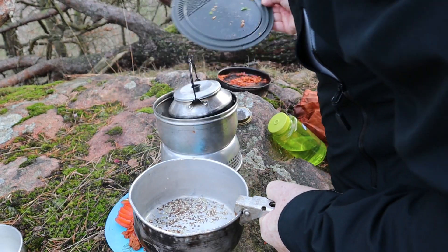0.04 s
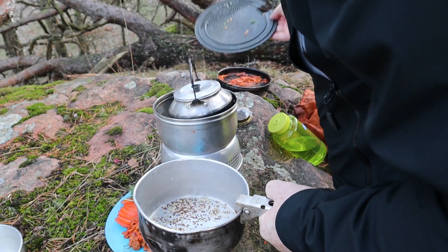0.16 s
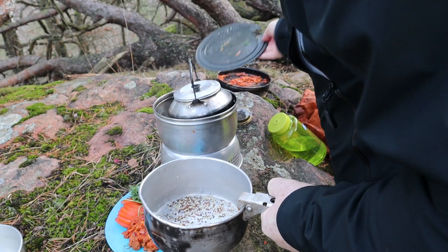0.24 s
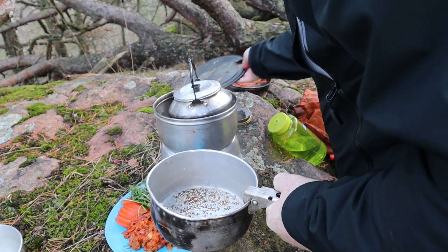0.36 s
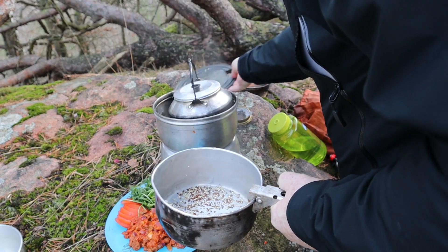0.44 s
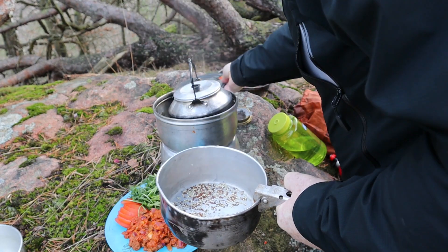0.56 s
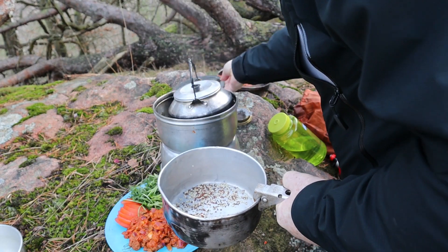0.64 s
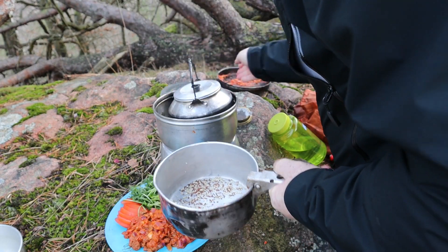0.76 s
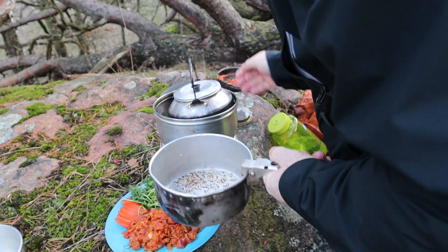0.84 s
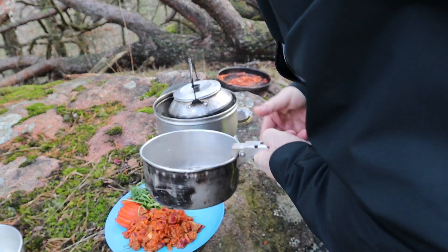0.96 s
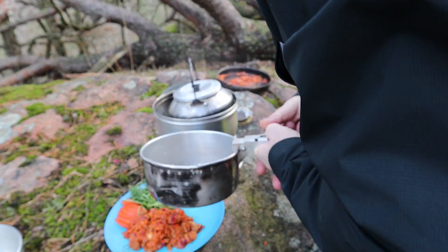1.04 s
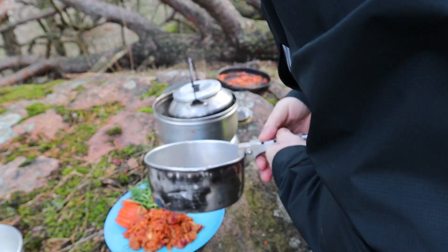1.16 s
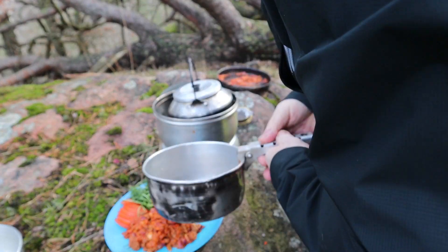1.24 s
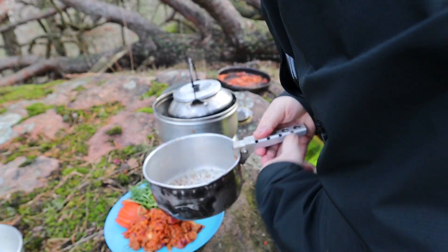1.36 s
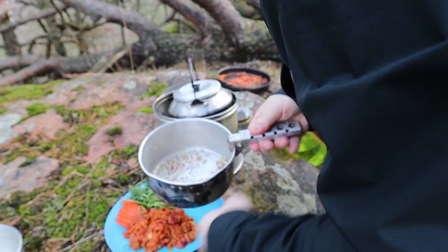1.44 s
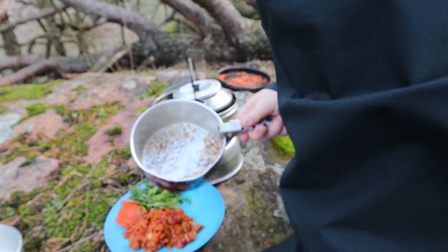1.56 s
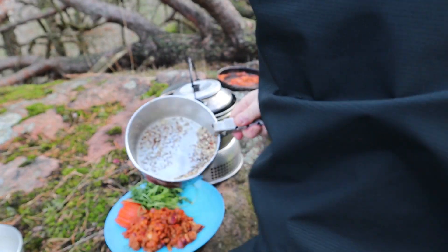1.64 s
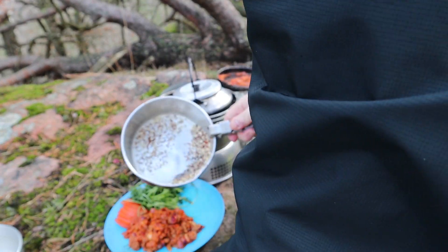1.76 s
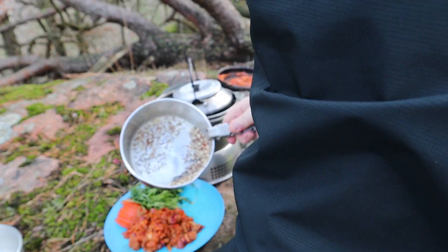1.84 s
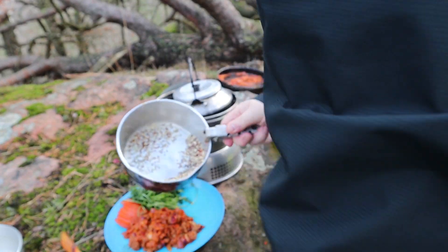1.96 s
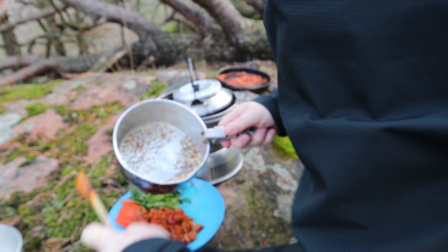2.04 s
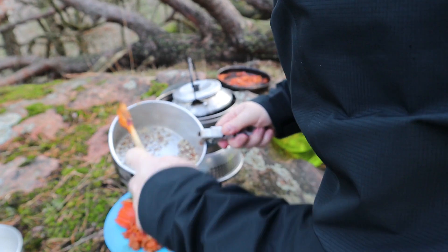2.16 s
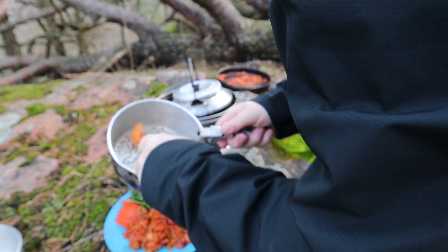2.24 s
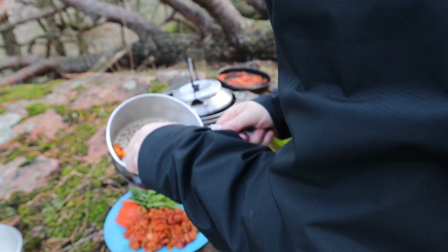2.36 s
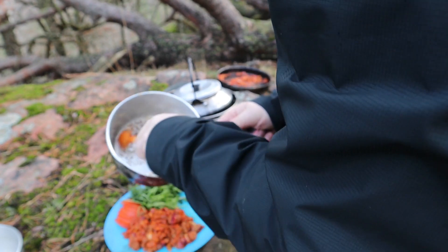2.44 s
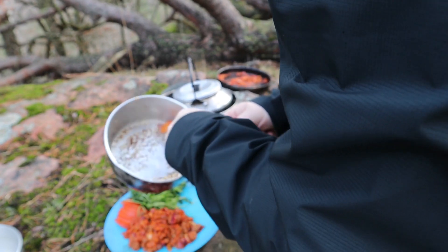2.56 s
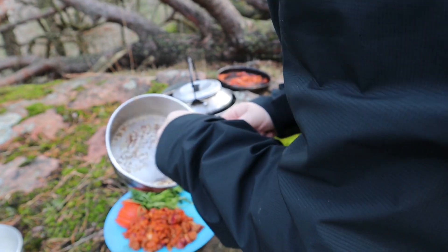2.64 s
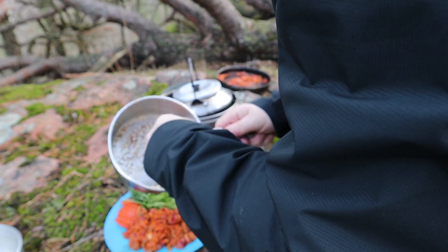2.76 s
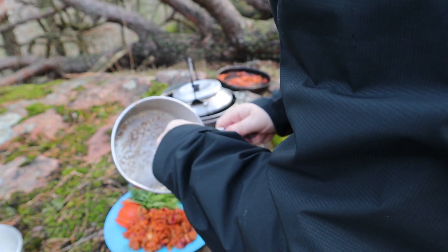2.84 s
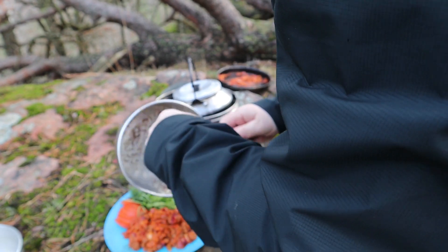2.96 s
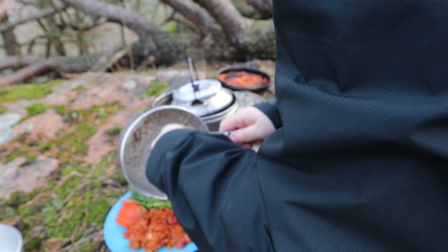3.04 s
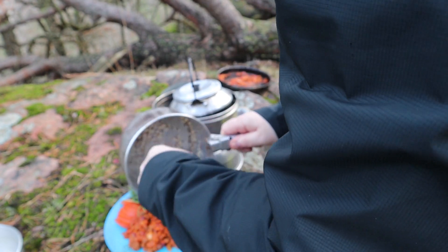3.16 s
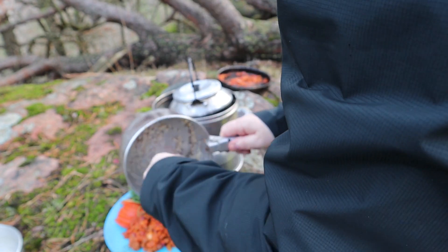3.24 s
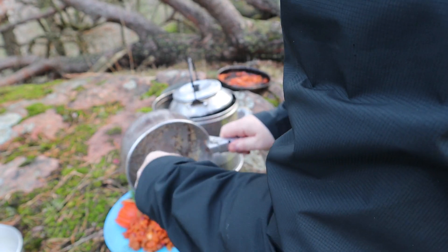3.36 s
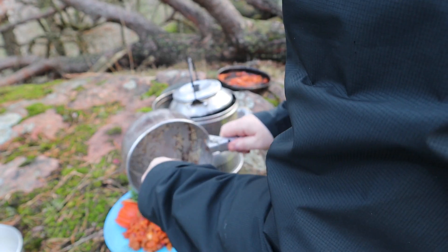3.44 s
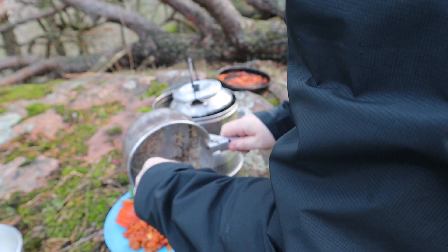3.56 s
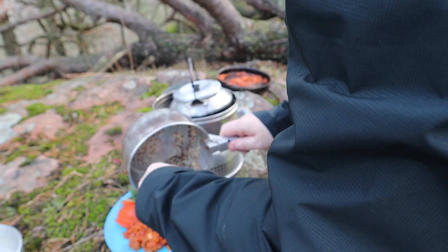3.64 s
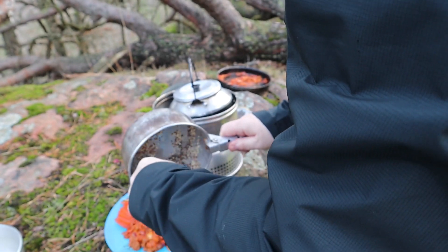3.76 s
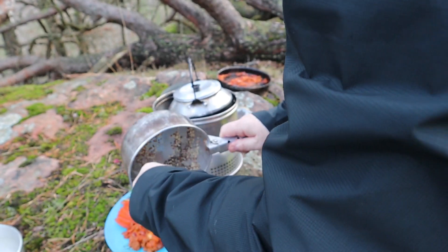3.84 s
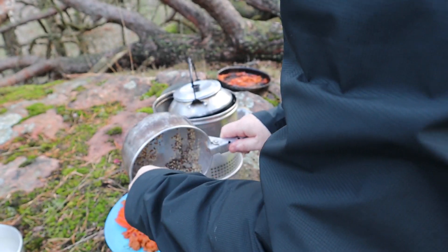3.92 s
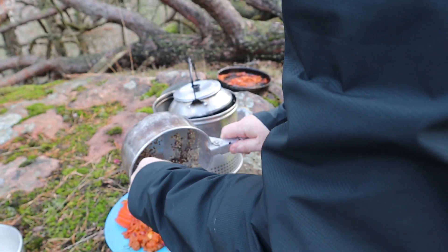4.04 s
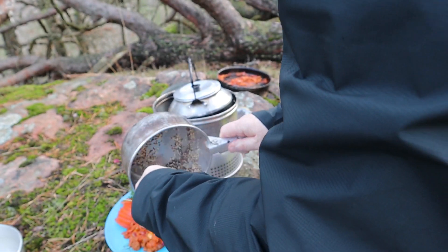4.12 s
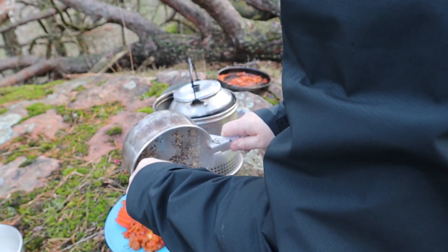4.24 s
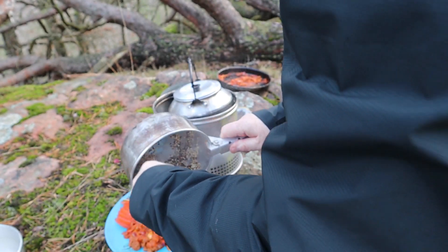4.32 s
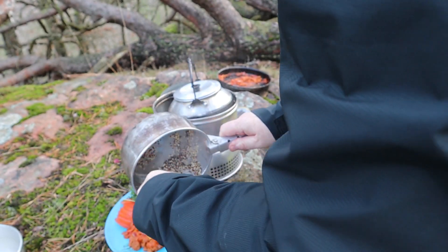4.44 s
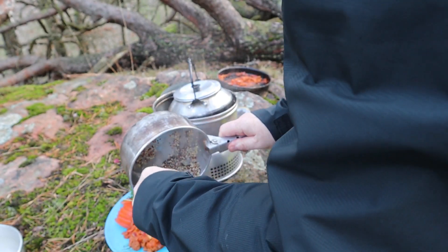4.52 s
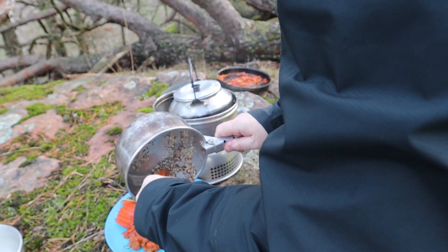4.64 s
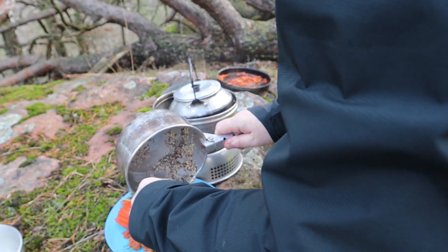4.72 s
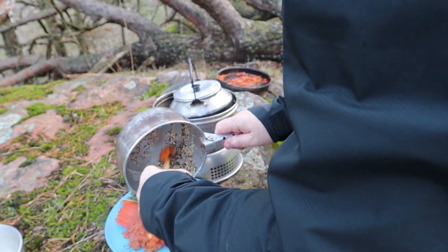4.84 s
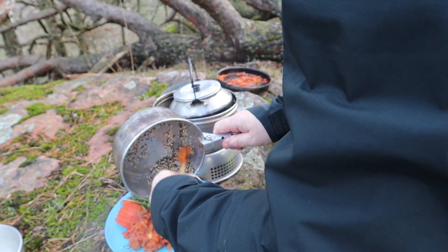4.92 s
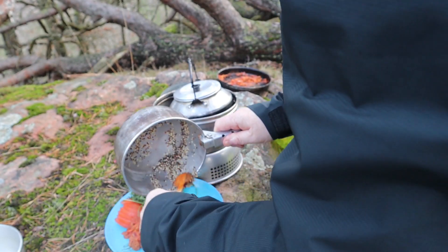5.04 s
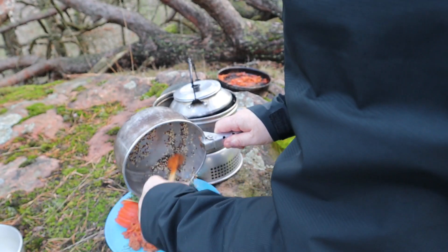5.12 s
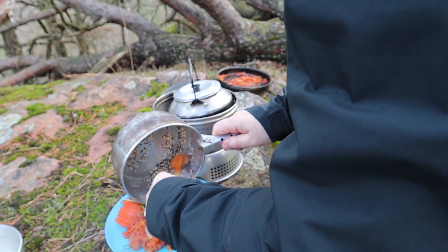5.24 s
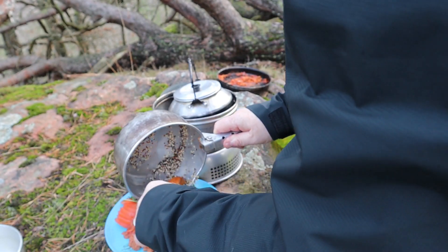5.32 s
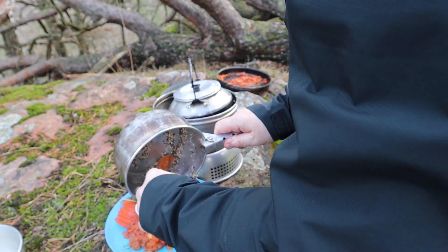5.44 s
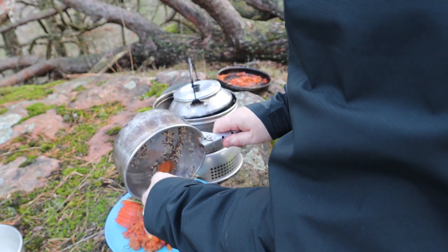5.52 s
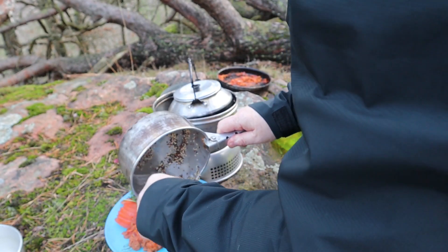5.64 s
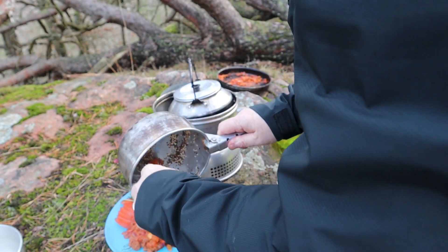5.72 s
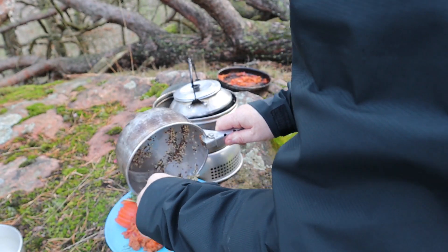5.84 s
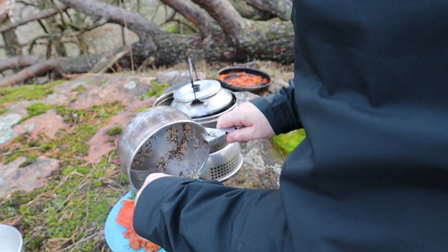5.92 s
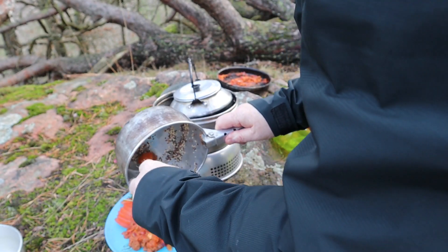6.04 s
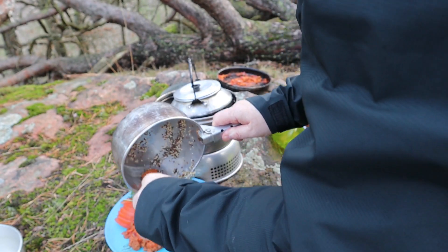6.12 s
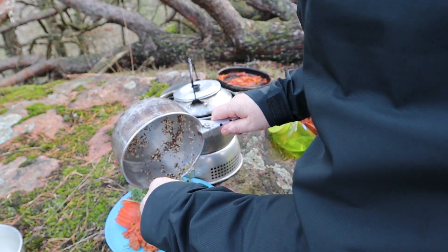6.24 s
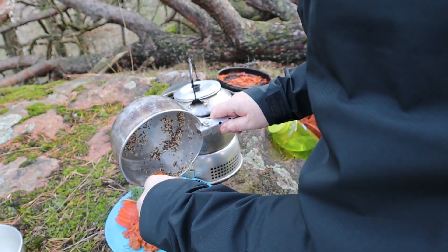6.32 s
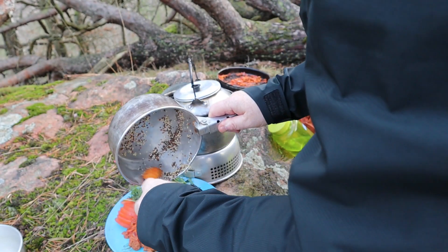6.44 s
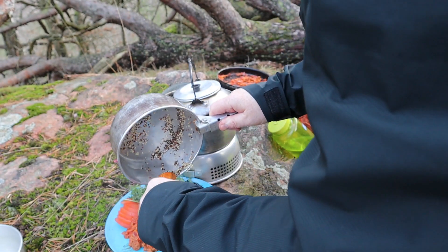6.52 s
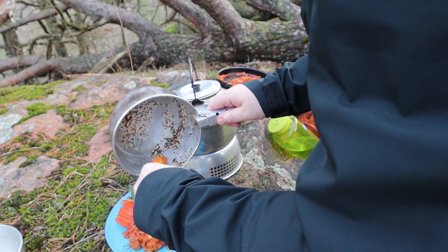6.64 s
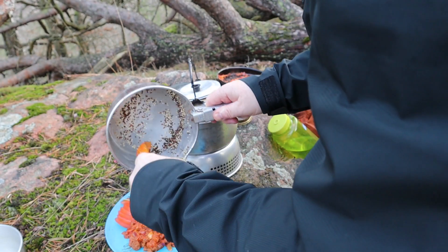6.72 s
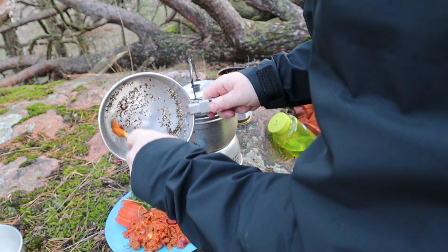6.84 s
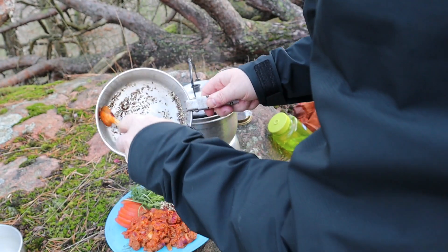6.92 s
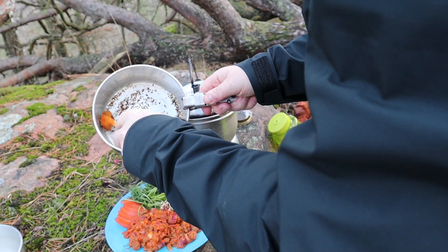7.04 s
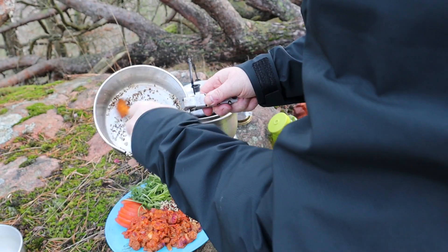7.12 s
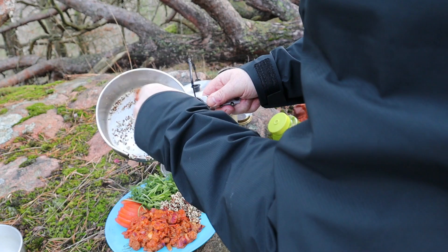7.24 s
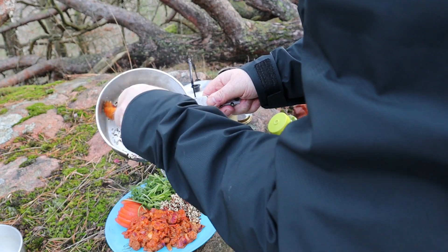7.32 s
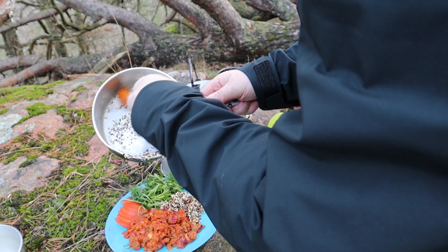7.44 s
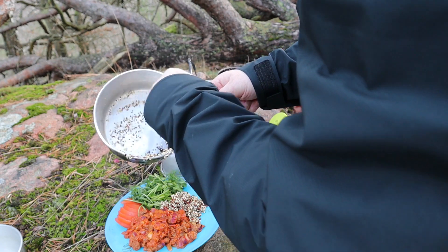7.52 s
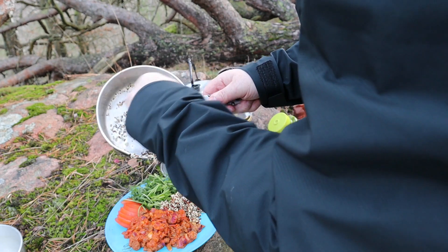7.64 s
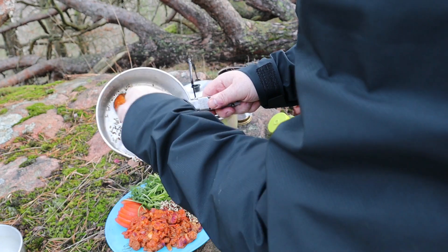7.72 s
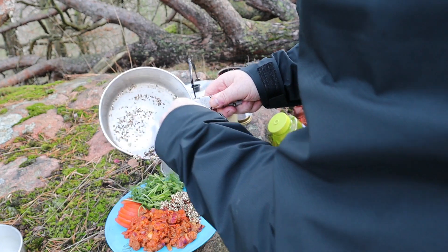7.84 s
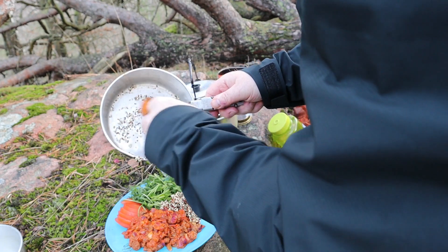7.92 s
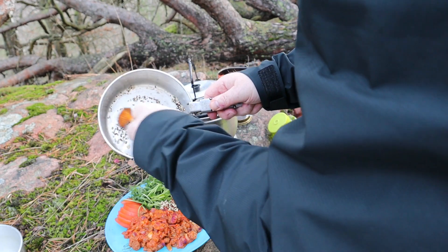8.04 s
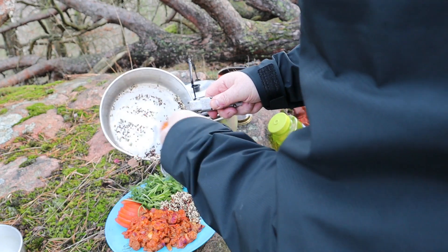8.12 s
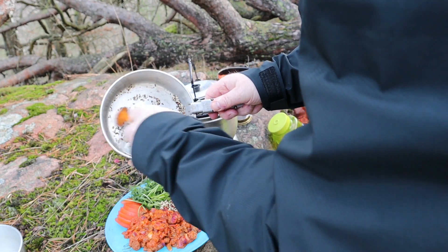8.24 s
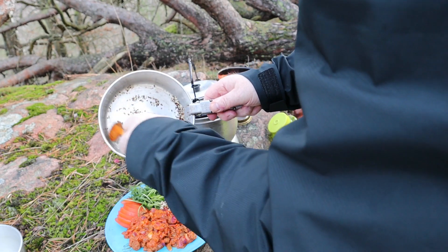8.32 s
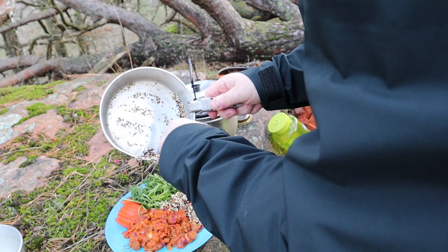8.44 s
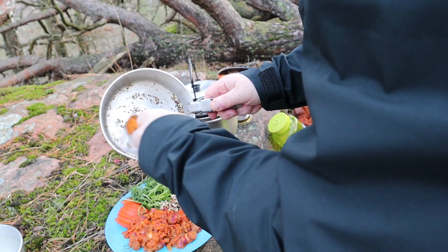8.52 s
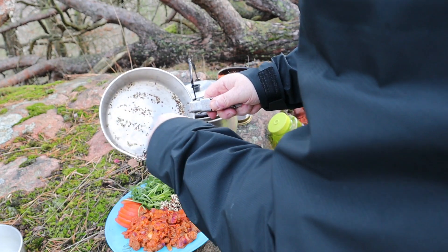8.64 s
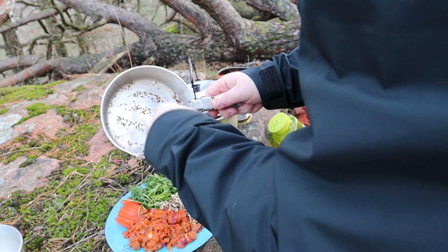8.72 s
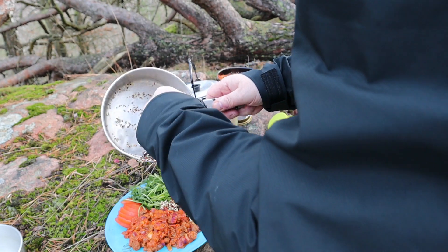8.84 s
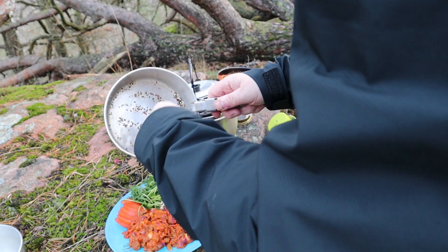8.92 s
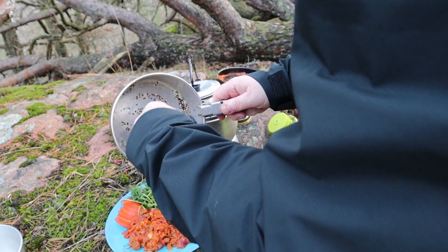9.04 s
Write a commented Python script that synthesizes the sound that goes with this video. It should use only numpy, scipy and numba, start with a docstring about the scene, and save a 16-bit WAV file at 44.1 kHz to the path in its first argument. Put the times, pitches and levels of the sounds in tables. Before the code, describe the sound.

Outdoors, a nylon sleeve rustles and a lid clacks down, then a plastic spoon knocks and scrapes sticky food from a thin, ringing metal pot.

```python
"""A soft forest rush and a nylon sleeve close by, with muffled bumps of gear, then a plastic lid is put down. A
thin camping pot is picked up, its metal gripper clinking, and scraped out with a plastic spoon. Knocks, first
of the gripper and then of the spoon, ring the pot's base and wall as decaying modes and add a clack of spoon
modes. Strokes are trains of random grain clicks that shake pot and spoon and sweep a resonant gap. Forest,
sleeve and crackling food are noise or grains shaped by a spectrum and a slow level curve."""
import sys
import numpy as np
from scipy import signal
from scipy.fft import rfft, irfft
from scipy.io import wavfile
from scipy.ndimage import uniform_filter1d
from numba import njit

SR = 44100
rng = np.random.default_rng(int(sys.argv[2]) if len(sys.argv) > 2 else 0)


def generate_wav(sig):
    """Save sig (samples, or channels by samples) to the path in sys.argv[1] as 16-bit PCM at SR."""
    pcm = np.round(np.clip(np.atleast_2d(sig).T, -1, 1) * 32767).astype(np.int16)
    wavfile.write(sys.argv[1], SR, pcm)


N = 399987
TOP_HZ = 15900
TIME = np.arange(N) / SR  # s
AFTER = np.arange(SR // 4) / SR  # s since a blow


def undb(db):
    """Decibels to gain."""
    return 10 ** (np.asarray(db) / 20)


def unit(x):
    """Scale to rms 1."""
    return x / np.sqrt(np.mean(x ** 2))


def noise(size):
    """White Gaussian noise."""
    return rng.standard_normal(size)


def curve(points):
    """Straight lines through (time_s, level_db) points, over the whole scene."""
    return np.interp(TIME, *np.transpose(points))


def fade(t60_s):
    """Exponential decay after a blow, 60 dB in t60_s."""
    return np.exp(-np.log(1000) * AFTER / max(t60_s, .002))


def add(out, start_s, x):
    """Mix x into out from start_s."""
    i = max(int(start_s * SR), 0)
    out[i:i + len(x)] += x[:N - i]


def colour(x, points):
    """Filter by a (freq_hz, level_db) spectrum, falling 12 dB/octave beyond its ends; rms 1."""
    freq_hz, level_db = np.transpose(points)
    octave = np.log2(np.fft.rfftfreq(len(x), 1 / SR) + 1)
    known = np.log2(freq_hz)
    skirt_db = -12 * abs(octave - np.clip(octave, known[0], known[-1]))
    gain = undb(np.interp(octave, known, level_db) + skirt_db)
    return unit(irfft(rfft(x) * gain, len(x)))


def walk(rate_hz, size):
    """Smoothed random steps with spread near 1."""
    k = max(int(SR / rate_hz), 1)
    steps = np.repeat(noise(size // k + 1), k)
    return np.sqrt(3 / 2) * uniform_filter1d(steps, k)[:size]


def grains(size, per_s, spread_db):
    """Dense random clicks; a larger spread makes them more unequal; rms 1."""
    strength = undb(spread_db * np.minimum(rng.exponential(size=size), 4))
    return unit(noise(size) * strength * (rng.random(size) < per_s / SR))


def ring(modes, clock_s=AFTER):
    """Sum of decaying (freq_hz, level_db, t60_s) modes; neighbours swing in opposite directions."""
    out = 0
    for k, (freq_hz, level_db, t60_s) in enumerate(modes):
        swing = np.sin(2 * np.pi * freq_hz * clock_s)
        out = out + (-1) ** k * undb(level_db) * fade(t60_s) * swing
    return out


def spot(modes, detune, spread_db):
    """Each point of contact shifts the modes a little and favours other ones."""
    return [(hz * (1 + detune * rng.standard_normal()), db + spread_db * rng.standard_normal(), t60_s)
            for hz, db, t60_s in modes]


def burst(points, t60_s):
    """Coloured noise that dies away without a pitch."""
    return colour(noise(len(AFTER)), points) * fade(t60_s)


def taps(events, points, t60_s):
    """Dry contacts: one burst for each (start_s, level_db)."""
    out = np.zeros(N)
    for start_s, level_db in events:
        add(out, start_s, undb(level_db) * burst(points, t60_s))
    return out


@njit
def resonate(x, hz, width_hz):
    """State-variable band-pass whose centre moves."""
    y, band, low = np.empty(len(x)), 0., 0.
    for i in range(len(x)):
        g, k = np.tan(np.pi * hz[i] / SR), width_hz / hz[i]
        v = (band + g * (x[i] - low)) / (1 + g * (g + k))
        band, low, y[i] = 2 * v - band, low + 2 * g * v, k * v
    return y


# forest spectrum: freq_hz, rel_level_db
FOREST = [(12, -38), (20, -11), (77, -2.5), (241, -1.5), (434, 2), (698, -0.5), (897, 1.5), (1610, -8),
          (3340, -13.5), (4420, -20), (8410, -21), (10200, -28), (13200, -26), (16000, -33)]
# mean level of the air flutter: time_s, level_db
DRAUGHT = [(0, -59.5), (1.4, -60), (2.2, -53), (3.3, -60), (6.5, -53), (7.9, -63), (9.07, -49)]


def forest(rush_db=-46):
    """A far, even rush of noise, and a low flutter of air over the microphone."""
    rush = colour(noise(N), FOREST) * undb(rush_db + 0.29 * walk(2.5, size=N))
    air = colour(noise(N), [(22, -6), (60, -5), (130, -10.5), (260, -16.5)])
    return rush + air * undb(curve(DRAUGHT) + 2 * walk(7.3, size=N))


def movements(rows):
    """Strength of arm movements that speed up and slow down; the strongest at each moment leads."""
    t = TIME[::100]
    each = []
    for peak_s, swell_s, fade_s, level_db in rows:
        span_s = np.where(t < peak_s, swell_s, fade_s)
        each.append(undb(level_db) * np.exp(-((t - peak_s) / span_s) ** 2))
    return np.interp(TIME, t, np.max(each, axis=0))


# wide reaches of the arm: peak_s, swell_s, fade_s, rel_level_db
REACHES = [(0, .1, 0.15, -50.5), (.5, 0.24, .2, -47), (1.07, 0.24, .14, -38), (1.72, 0.28, 0.085, -39),
           (2.13, 0.13, 0.15, -42)]
# nylon cloth spectrum: freq_hz, rel_level_db
CLOTH = [(120, -34), (200, -14), (244, -10), (413, -14), (457, -7.5), (904, 2), (1030, -2), (1310, -0.5),
         (6000, -13), (7800, -34), (13200, -120)]
# small arm swing leading into every knock; rest level between movements
SWING_DB, SWING_LEAD_S, SWING_S, REST_DB = -53.5, 0.016, 0.059, -63.5


def sleeve(rustle_db=-1, reach_sheen_db=-9.5, swing_sheen_db=-8, flutter_db=1.6):
    """Nylon threads slide over each other as the arm reaches out or swings into a knock."""
    swings = [(s - SWING_LEAD_S, SWING_S, SWING_S, SWING_DB) for s, *_ in KNOCKS]
    reach = movements(REACHES)
    swing = undb(REST_DB) + movements(swings)
    rustle = undb(rustle_db) * np.hypot(reach, swing) * colour(grains(N, per_s=6000, spread_db=0.5), CLOTH)
    sheen_gain = np.hypot(undb(reach_sheen_db) * reach, undb(swing_sheen_db) * swing)
    sheen = sheen_gain * colour(grains(N, per_s=12000, spread_db=0.5), GRIT)
    return (rustle + sheen) * undb(flutter_db * walk(35, size=N))


# soft bumps of handled gear: start_s, level_db
BUMPS = [(.055, -35.5), (.32, -37), (.805, -35.5), (.83, -35.5), (.889, -39), (.934, -33), (.942, -35),
         (.970, -30)]
# bump spectrum: freq_hz, rel_level_db
BUMP = [(250, -19), (480, -1), (900, 0.5), (1300, -12), (4000, -26)]


def bumps():
    """Gear is handled: soft, low contacts without pitch."""
    return taps(BUMPS, BUMP, t60_s=0.068)


# lid meets the rock: start_s, level_db
LID_TAPS = [(0.6342, -17), (0.6382, -43)]
# lid spectrum: freq_hz, rel_level_db
LID = [(88, -45), (150, -22), (612, 1.5), (1010, -1), (1320, -7), (1640, -23), (1870, -24), (2700, -8),
       (2970, -30), (3400, 3), (3670, -13), (3970, -3), (5950, -20), (8410, -18), (15000, -60)]


def lid():
    """The plastic lid lands on rock: dry noise, quickly damped."""
    return taps(LID_TAPS, LID, t60_s=0.02)


# gripper shifts on the rim: start_s, level_db
GRIPS = [(1.365, -30), (1.444, -36), (2.128, -34)]
# gripper modes: freq_hz, rel_level_db, t60_s
GRIPPER = [(1610, 0, .035), (2440, -0.5, 0.03), (3090, -8.5, 0.033)]


def gripper(tick_db=-7, tick_t60_s=0.031):
    """The metal gripper clinks against the rim as the pot changes hands: ringing modes and a tick."""
    out = taps([(s, db + tick_db) for s, db in GRIPS], TICK, tick_t60_s)
    for start_s, level_db in GRIPS:
        add(out, start_s, undb(level_db) * ring(spot(GRIPPER, 0.0083, 3)))
    return out


# knocks on the pot, first by the metal gripper, then by the spoon; levels relative, press = how hard the
# striker stays on (0-1): # start_s, base_db, wall_db, thud_db, thud_hz, clack_db, tick_db, press
KNOCKS = [(1.7016, -10.5, -17, -14, 560, -11, -20.5, 0.2), (1.711, -44, -24, -40, 600, -21, -26, 0.03),
          (1.722, -47, -32, -45, 600, -25, -37, 0), (1.797, -24.5, -40, -20.5, 740, -23, -37, 1),
          (1.9483, -13.5, -18.5, -17, 694, -16, -24.5, 0.28),
          (2.426, -26, -25, -35, 585, -20.5, -34.5, 0.18), (2.4581, -13.5, -24.5, -9, 614, -43, -47, 0.15),
          (2.552, -41, -29.5, -38, 600, -47, -40, 0), (2.617, -16.5, -31, -11, 695, -25.5, -23.5, 0.13),
          (2.8019, -13, -19, -17, 570, -31, -35.5, 0.16), (2.812, -2.5, -12, -33, 312, -24, -37, 1),
          (2.845, -18, -23, -25, 570, -29, -39, 0.7), (2.89, -25.5, -34, -40, 352, -46, -37, .2),
          (3.0125, -21, -27, -18, 740, -50, -58, .2), (3.098, -26, -24, -42, 760, -52, -34, 0.05),
          (3.232, -21, -26.5, -33, 760, -45, -49, 0.02), (3.266, -36, -30, -45, 600, -47, -36, .1),
          (3.5148, -49, -50, -45, 310, -34, -36, 0.5), (3.633, -50, -54, -47, 670, -41, -36, 0),
          (4.208, -42, -45, -45, 300, -37, -50, .1), (4.376, -9, -19.5, -22, 694, -23.5, -28, 0.13),
          (4.49, -30, -48, -44, 580, -48, -39, 0), (4.691, -17, -37, -17, 570, -20, -37, 0.02),
          (4.8334, -33, -34, -34, 296, -29, -41, .9), (5.0056, -21.5, -23.5, -42, 570, -8.5, -12.5, 0),
          (5.298, -21.5, -30, -20, 730, -32, -14, 0), (5.5234, -7.5, -21.5, -22, 710, -26, -48, 0.09),
          (5.806, 1.5, -11, -35, 523, -13, -21, 0.41), (5.868, -19.5, -45, -20.5, 724, -12.5, -33, 0.03),
          (6.1431, -10, -27, -28, 706, -29, -34, 0.03), (6.197, -22.5, -36, -24, 684, -10, -19.5, 0.5),
          (6.5254, -23, -25.5, -25, 560, -20.5, -22, 0), (6.677, -18, -27, -17.5, 555, -23.5, -27.5, 0.19),
          (7.0167, -28.5, -43, -28, 380, -45, -31.5, 0), (7.1518, -11.5, -14, -5, 590, -18, -28.5, 0.1),
          (7.2454, -20.5, -38, -23, 674, -43, -39, 0.48), (7.468, -17, -11, -1, 550, -23, -26, 0.05),
          (7.534, -31, -26, -21, 590, -32, -37, 0.43), (7.563, -47, -26, -19, 614, -28, -34, 0),
          (7.769, -44, -38, -44, 597, -52, -31.5, 0), (7.8114, -1, -9, 1.5, 670, -17, -33, 0.64),
          (7.909, -32, -25.5, -45, 600, -20.5, -33, 0.12), (8.0916, -4.5, -5.5, 4, 676, -11.5, -31.5, 0.71),
          (8.211, -33, -38, -45, 600, -36, -32, 0.18), (8.3845, -10.5, -8, -2.5, 640, -42, -37, 0.15),
          (8.4506, -14, -21, -45, 600, -17.5, -30, 0.57), (8.5615, -27.5, -28, -34, 345, -49, -43, 0),
          (8.65, -23, -25, -13, 434, -30, -23, 0.3), (8.9072, -7, -15, -45, 600, -33, -23.5, 0.04),
          (8.956, -30, -20, -28, 380, -30.5, -31, 0.53)]
# upper modes of the pot wall: freq_hz, rel_level_db, t60_s
WALL = [(857, 0, 0.013), (1215, -25, 0.094), (1498, -10, 0.063), (1920, -35, 0.052), (2263, -18.5, 0.039),
        (3250, -33, 0.035)]
# spoon modes, also used for the clack of the gripper's knocks: freq_hz, rel_level_db, t60_s
SPOON = [(1315, -6.5, .025), (1546, 1, 0.02), (1955, -10.5, 0.026), (2221, -8, 0.026), (2690, -19.5, 0.031),
         (2930, -17.5, 0.043), (3394, -12.5, 0.026), (4100, -20, 0.03), (8260, -24, .025)]
# hard-contact spectrum: freq_hz, rel_level_db
TICK = [(1500, 14), (3300, 8), (5200, 7.5), (8000, 9), (9500, 2.5), (12500, 3.5), (16000, -8)]
BASE_HZ = 423  # drum mode of the free base


def knocks(contact_s=0.0047, stiffen=0.44, base_loss_db_per_s=2200, wall_loss_db_per_s=1000, rise_s=0.00062,
           free_t60_s=0.22, damping=2.38, rim_hz=768, rim_stiffen=0.1, rim_t60_s=0.1, thud_t60_s=0.017,
           tick_t60_s=0.03, tick_offset_db=-3, spot_db=2, radiate_hz=290, hardness=0.52, cushion_db=9):
    """The pressed striker stiffens and damps the base and the two thud together; then the pot rings freely."""
    out = np.zeros(N)
    contact = np.cumsum(np.exp(-(AFTER / contact_s) ** 2)) / SR  # s of contact so far
    onset = 1 - np.exp(-AFTER / rise_s)
    for start_s, base_db, wall_db, thud_db, thud_hz, clack_db, tick_db, press in KNOCKS:
        held = press * contact
        loss = 1 + damping * press  # pressure shortens base and rim
        base_ring = ring([(BASE_HZ, 0, free_t60_s / loss)], AFTER + stiffen * held)
        base = undb(base_db - base_loss_db_per_s * held) * base_ring
        rim = ring([(rim_hz * (1 + rim_stiffen * press), 0, rim_t60_s / loss)])
        wall = undb(wall_db - wall_loss_db_per_s * held) * (ring(spot(WALL, 0.016, spot_db)) - rim)
        thud = ring([(thud_hz, thud_db, thud_t60_s)])
        # a contact cushioned by food has little tick and leaves the upper spoon modes quiet
        tilt_db_per_octave = np.clip(hardness * (tick_db - clack_db + cushion_db), -7, 3)
        spoon = [(hz, db + tilt_db_per_octave * np.log2(hz / SPOON[1][0]), t60_s) for hz, db, t60_s in SPOON]
        clack = undb(clack_db) * ring(spot(spoon, 0.026, spot_db))
        tick = undb(tick_db + tick_offset_db) * burst(TICK, tick_t60_s)
        add(out, start_s, onset * (base + wall + thud) + clack + tick)
    # a small pot radiates little bass
    highpass = signal.butter(3, radiate_hz, "high", fs=SR, output="sos")
    return signal.sosfilt(highpass, out + 1e-18)


# mean crackle level, higher as the spoon sweeps the bare base: time_s, level_db
CRACKLE = [(0, -82), (2.3, -59), (2.6, -55.5), (3.8, -66), (6.8, -67), (7.25, -53), (9.07, -68)]
# spectrum of food sliding on metal: freq_hz, rel_level_db
GRIT = [(2000, -20), (3400, 2), (4700, -5.5), (5700, -1.5), (6400, -2.5), (7100, 2), (8400, 4), (9800, -5),
        (12500, -2.5), (16000, -14)]


def crackle(patchy_db=4.5):
    """Damp, sticky grains pull apart under the spoon in uneven bursts."""
    level_db = curve(CRACKLE) + patchy_db * walk(14, size=N)
    return undb(level_db) * colour(grains(N, per_s=2200, spread_db=3.5), GRIT)


# spoon strokes, levels relative, rasp_hz = mid pitch before wander:
# peak_s, swell_s, fade_s, ring_db, rasp_db, hiss_db, rasp_hz
STROKES = [(2.876, .047, 0.019, -35, -45, -47, 3180), (3.15, 0.09, 0.034, -67, -56, -50, 3350),
           (3.25, 0.034, 0.11, -44, -45.5, -51.5, 3800), (3.524, 0.027, 0.022, -60, -40, -50, 2860),
           (3.67, 0.054, .11, -49, -46, -55, 3270), (3.92, 0.048, 0.025, -57, -51, -53, 3330),
           (4.25, 0.11, 0.061, -64, -51.5, -50, 3420), (4.499, 0.034, 0.055, -62, -44, -45.5, 3480),
           (4.786, 0.074, 0.052, -42.5, -46, -46, 3370), (5.09, 0.064, 0.072, -54, -49, -49, 3270),
           (5.375, 0.059, 0.041, -51, -39.5, -41.5, 3100), (5.533, 0.013, 0.042, -54, -26.5, -26, 7900),
           (5.65, 0.036, 0.082, -70, -44, -34.5, 7400), (5.9, 0.02, 0.18, -64, -57, -53.5, 3350),
           (6.303, .1, .06, -58, -46.5, -42, 3160), (6.559, 0.026, .046, -35.5, -57, -40.5, 8050),
           (7.226, .045, 0.043, -34, -45.5, -50, 1990), (7.575, .066, 0.093, -35, -40.5, -46, 2050),
           (7.908, 0.05, 0.044, -29.5, -34, -41.5, 2120), (8.199, 0.077, 0.039, -30, -51, -44, 2120),
           (8.492, 0.068, 0.024, -29.5, -30, -40, 3120), (8.547, 0.027, 0.019, -46, -39, -39, 5000),
           (8.729, 0.057, 0.028, -27.5, -34.5, -44.5, 2940), (8.986, 0.039, 0.082, -38, -44.5, -43.5, 2090)]


def scrapes(base_db=-5, base_t60_s=0.2, rim_hz=790, rim_t60_s=0.015, wall_db=3, pot_db=-2,
            loaded_hz=680, wander=0.2, loaded_width_hz=110., loaded_db=-4, spoon_db=-7,
            gap_db=-1.5, gap_width_hz=480., overtone=1.69, overtone_db=-7,
            judder_hz=130, judder_db=2.5, glide_octaves=0.44, gap_wander_octaves=0.083):
    """Grains catch and slip, shaking pot and spoon; the gap between them resonates, rising as it closes."""
    out = np.zeros(N)
    pot = ring([(BASE_HZ, base_db, base_t60_s), (rim_hz, 0, rim_t60_s)]) - undb(wall_db) * ring(WALL)
    for peak_s, swell_s, fade_s, ring_db, rasp_db, hiss_db, rasp_hz in STROKES:
        t = np.arange(-max(swell_s, .01), max(fade_s, .015), 1 / SR)
        n, start_s = len(t), peak_s + t[0]
        push = np.interp(t, [t[0], 0, t[-1]], [0, 1, 0]) ** 0.77
        force = push * undb(judder_db * walk(judder_hz, size=n))
        slips = force * grains(n, per_s=1400, spread_db=3.2)

        spoon = ring(spot(SPOON, 0.039, 9.3))
        for body, body_db in ((pot, ring_db + pot_db), (spoon, rasp_db + spoon_db)):
            impulse = body / np.sqrt(np.sum(body ** 2))
            add(out, start_s, undb(body_db) * signal.fftconvolve(slips, impulse))

        # the base, stiffened under the spoon, changes pitch as the spoon travels
        base_hz = loaded_hz * np.exp(wander * walk(28.3, size=n))
        loaded = unit(resonate(slips, base_hz, loaded_width_hz))

        glide = glide_octaves * np.linspace(-.5, .5, n)
        gap_hz = rasp_hz * 2 ** (glide + gap_wander_octaves * walk(91, size=n))
        upper = resonate(slips, np.minimum(overtone * gap_hz, TOP_HZ), gap_width_hz)
        gap = unit(resonate(slips, gap_hz, gap_width_hz) - undb(overtone_db) * upper)

        # fine food hisses between the coarser slips
        hiss = colour(force * grains(n, per_s=7900, spread_db=0.0), GRIT)
        mix = undb(ring_db + loaded_db) * loaded + undb(rasp_db + gap_db) * gap + undb(hiss_db) * hiss
        add(out, start_s, np.std(slips) * mix)
    return out


def grazes(clack_db=-42, tick_db=-41, scatter_s=0.053, scatter_db=3, tick_t60_s=0.029):
    """Around each stroke the spoon's edge touches the metal lightly once more: tick plus spoon modes."""
    out = np.zeros(N)
    for peak_s, *_ in STROKES:
        when, size = rng.standard_normal(2)
        tick = undb(tick_db) * burst(TICK, tick_t60_s)
        clack = undb(clack_db) * ring(spot(SPOON, 0.048, 3.5))
        add(out, peak_s + scatter_s * when, undb(scatter_db * size) * (tick + clack))
    return out


def scene():
    """All sources summed, close to one microphone in the open air."""
    handling = bumps() + lid() + gripper()
    spooning = knocks() + crackle() + scrapes() + grazes()
    return (forest() + sleeve() + handling + spooning)[None]


def record(dry):
    """Clip at full scale, then a steep low-pass at TOP_HZ."""
    lowpass = signal.ellip(10, .2, 80, TOP_HZ, fs=SR, output="sos")
    return signal.sosfilt(lowpass, np.clip(dry, -1, 1))


dry = scene()
out = record(dry)
generate_wav(out)
```